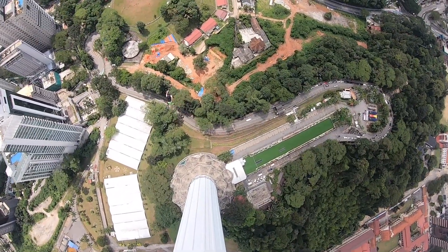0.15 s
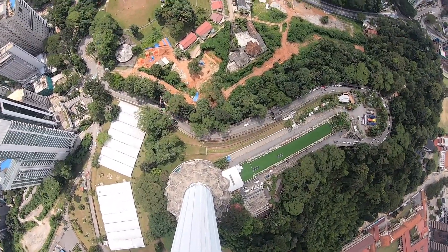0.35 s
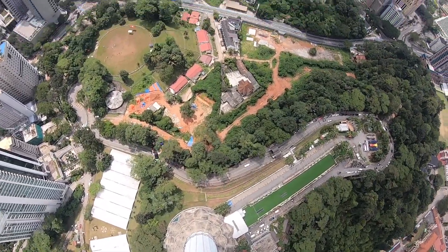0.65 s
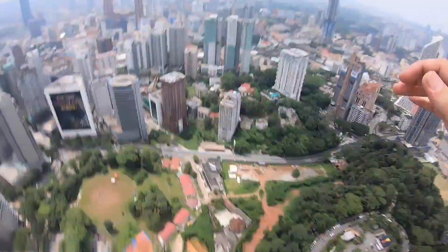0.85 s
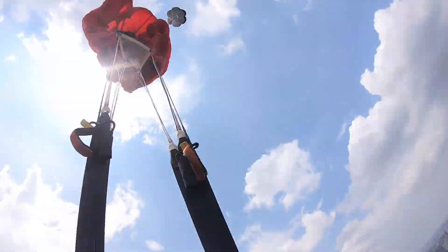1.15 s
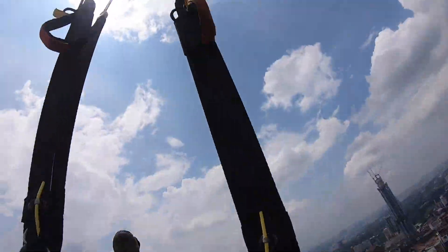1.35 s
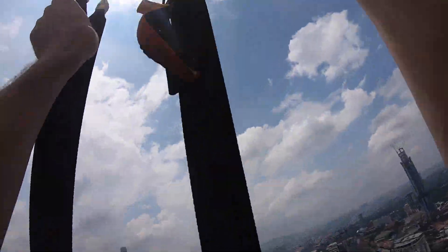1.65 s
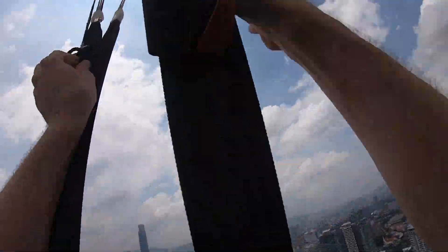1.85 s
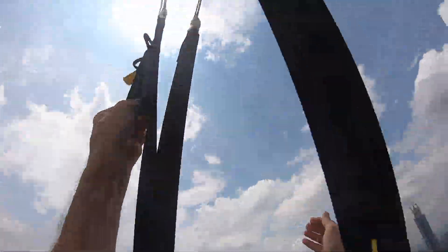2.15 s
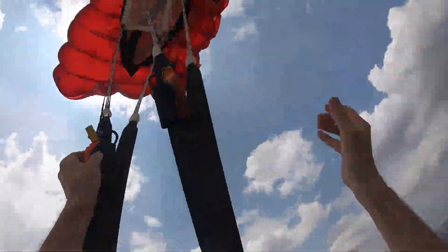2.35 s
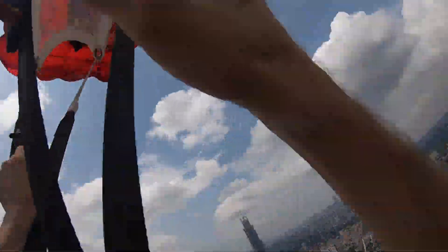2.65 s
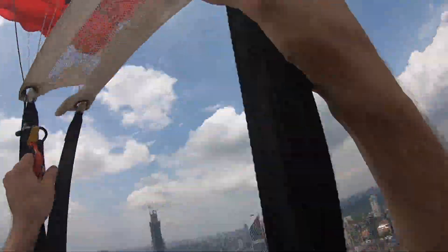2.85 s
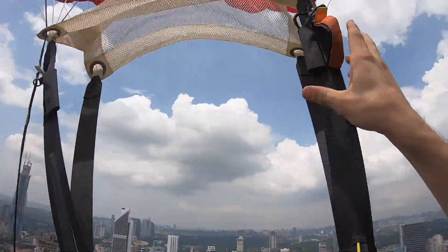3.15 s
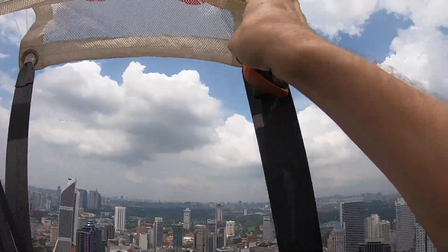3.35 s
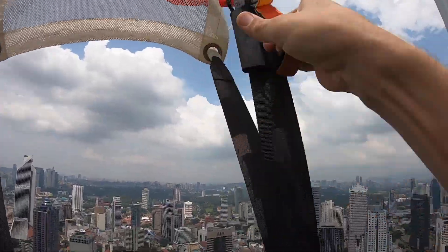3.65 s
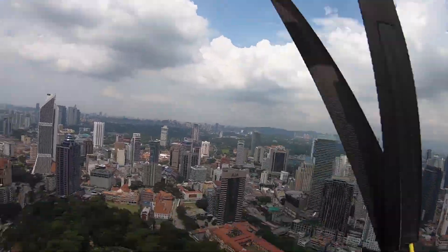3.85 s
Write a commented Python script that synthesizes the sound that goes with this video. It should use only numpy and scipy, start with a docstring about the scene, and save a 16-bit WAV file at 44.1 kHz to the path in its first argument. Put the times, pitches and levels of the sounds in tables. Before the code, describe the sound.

Loud wind rushes and rumbles on the microphone of a falling jumper. A parachute cracks and flaps open, then the wind dies to a soft hiss, with short rips of hook-and-loop tape near the end.

```python
"""Loud wind buffets the microphone as a jumper falls: low eddies under a churning rush of air.
A parachute streams out, cracks and flaps as it fills, and its hollows ring. The braked rush dulls
and dies down to a soft hiss of air past the lines and fluttering cloth. In the glide the webbing
rustles and the steering handles rip off their hook-and-loop tape in bursts of tiny clicks."""
import sys
import numpy as np
from scipy import signal
from scipy.fft import rfft, irfft, next_fast_len
from scipy.io import wavfile
from scipy.ndimage import uniform_filter1d

SR = 44100
rng = np.random.default_rng(int(sys.argv[2]) if len(sys.argv) > 2 else 0)


def dump_mix(stems):
    """Bounce the given channels to the path in sys.argv[1] as a 16-bit WAV at rate SR."""
    frames = np.atleast_2d(stems).T  # one column per channel
    limited = np.clip(frames, -1, 1)  # hard clip at full scale
    pcm = np.round(limited * 32767).astype(np.int16)
    wavfile.write(sys.argv[1], SR, pcm)


N = 176400
TIME = np.arange(N) / SR

# air past canopy and lines: t/s, canopy level/dB, line level/dB
HISS_LEVELS = [(1.1, -47, -53), (1.87, -49.5, -63), (2.1, -38.5, -52), (2.37, -41, -47.5),
               (2.75, -42.5, -64), (2.96, -48.5, -61.5), (3.15, -39.5, -57), (3.47, -54.5, -77),
               (3.68, -46, -61), (4, -44.5, -53)]
# tape rips, webbing scuffs: crest t/s, length/s, level/dB, tilt/(dB/oct)
TAPE_RIPS = [(.762, 0.0027, -21, 6), (1.098, 0.011, -39.5, 10), (2.838, 0.019, -45, -5),
             (3.037, 0.026, -42.5, 8), (3.051, 0.007, -30, -2.5), (3.71, 0.003, -31.5, -6),
             (3.744, 0.0051, -37, 1), (3.768, 0.0025, -24.5, -2.5), (3.782, 0.0033, -27, 0),
             (3.787, 0.035, -32, 1.5), (3.801, 0.0053, -20.5, -0.5), (3.838, 0.033, -41, -1),
             (3.87, 0.01, -23, -1.5), (3.877, .002, -24, 1), (3.884, 0.0073, -26.5, -3)]
# air and webbing past edges: crest t/s, length/s, level/dB, f/Hz, sweep/(oct/s), half-width/f
EDGE_SWISHES = [(0.249, 0.66, -19.5, 195.5, -0.82, .16), (1.21, 0.022, -27, 2350, -16, 0.14),
                (1.309, 0.12, -29.5, 1552, -4.5, 0.25), (3.167, 0.19, -51, 2020, -2, .14),
                (3.603, 0.046, -37, 483, 15.5, 0.48), (3.982, 0.085, -38, 2300, 0.5, 0.18)]
# flutter of the filling canopy: t/s, level/dB
FILLING_LEVELS = [(1.72, -42.5), (1.87, -46), (2.1, -46), (2.9, -55.5)]
# cloth flaps and gusts: crest t/s, length/s, level/dB, tilt/(dB/oct)
CLOTH_FLAPS = [(.865, 0.0094, -14.5, 2), (.943, 0.0056, -13.5, 4), (1.058, 0.0027, -17.5, 6.5),
               (1.067, 0.004, -24.5, 8), (1.175, 0.0054, -11, -2), (1.206, 0.008, -14.5, 6.5),
               (1.222, 0.017, -17, 1.5), (1.251, 0.0084, -22.5, 8), (1.301, 0.0067, -21, 6.5),
               (1.346, 0.0033, -7.5, -4), (1.413, 0.0093, -21.5, 3), (1.482, 0.007, -13, -2),
               (1.497, 0.0055, -16.5, 1.5), (1.548, 0.0023, -11, 1), (1.59, 0.003, -20.5, 2.5),
               (1.602, 0.0079, -14.5, -2.5), (1.646, 0.0035, -28.5, 1.5), (1.778, 0.0082, -27, -0.5),
               (1.833, 0.0041, -23, -3), (1.954, 0.01, -22.5, 0.5), (2.066, 0.0031, -18.5, -3),
               (2.278, 0.019, -23.5, -2.5), (2.326, 0.013, -19.5, -1), (2.675, 0.0073, -20, -10.5),
               (3.105, 0.046, -27.5, -9.5)]
# rush of the fall: t/s, level/dB, tilt/(dB/oct)
RUSH_LEVELS = [(0, -14, -0.5), (.85, -17, -0.5), (.98, -20.5, -4), (1.12, -19, -5.5), (1.27, -16.5, -3.5),
               (1.41, -16.5, -8), (1.49, -20, -6.5), (1.56, -23, -7), (1.87, -37, -8.5), (2.12, -38, -10),
               (2.3, -27.5, -5.5), (2.55, -36, -6), (3.2, -49.5, -1), (4, -46.5, 0.5)]
# eddies on the microphone: t/s, level/dB
BUFFET_LEVELS = [(0, -16.5), (.6, -15), (1.0, -17), (1.2, -14.5), (1.68, -15.5), (2.1, -18.5),
                 (2.25, -14.5), (2.6, -20.5), (2.95, -29.5), (3.23, -39), (3.45, -38.5), (3.63, -32.5),
                 (3.73, -38.5), (3.81, -30.5), (4, -28)]
# single heavy eddies: crest t/s, length/s, level/dB
HEAVY_EDDIES = [(3.105, 0.035, -16.5), (3.498, 0.01, -31)]

# source spectra: f/Hz, relative density/dB
CANOPY_SPECTRUM = [(150, 6.5), (400, 3.5), (1000, -2), (1800, -6), (3300, -12), (4300, -23.5),
                   (8000, -29.5), (11500, -62.5)]
LINE_SPECTRUM = [(1000, -14), (3200, 12.5), (5400, 5.5), (6200, -11.5), (8200, -15), (9500, -37)]
RIP_SPECTRUM = [(300, -21), (800, -16), (1300, 3), (2200, 1), (3000, 5.5), (4200, 0.5), (6000, -1.5),
                (8000, -12), (15000, -30.5)]
FLAP_SPECTRUM = [(80, -22), (170, 11), (350, 13.5), (700, 1), (1500, -8.5), (3000, -16.5), (6000, -32.5),
                 (15000, -72)]
RUSH_SPECTRUM = [(70, -15), (125, -2.5), (190, 1), (300, -3), (500, -7), (1400, -16), (2000, -20),
                 (4000, -26.5), (6500, -34.5), (9500, -37.5), (13000, -52.5)]
BUFFET_SPECTRUM = [(20, -1), (35, -4), (60, 0.5), (88, 0.5), (130, -3), (200, -13.5), (300, -19.5),
                   (1000, -83)]
# resonances of stiff tape and cloth hollows: f/Hz, width/Hz, gain/dB
TAPE_MODES = [(3110, 130, 4)]
HOLLOW_MODES = [(754, 150, 1), (1143, 200, 4), (1780, 200, -1)]

OPENING_S, FLUTTER_HZ, FLICKER_DB = 0.92, 36.7, 1.86
CREASES_PER_S, HOOKS_PER_S, LINE_TICKS_PER_S = 3500, 2000, 260


def from_db(db):
    return 10 ** (np.asarray(db) / 20)


def unit_rms(x):
    return x / np.sqrt(np.mean(x ** 2) + 1e-20)


def curves(rows):
    """Each column after t/s, interpolated per sample."""
    t_s, *columns = np.transpose(rows)
    return [np.interp(TIME, t_s, column) for column in columns]


def spectrum_db(spectrum, hz):
    """Spectrum interpolated over log frequency."""
    points_hz, points_db = np.transpose(spectrum)
    return np.interp(np.log(hz), np.log(points_hz), points_db)


def drift(rate_hz):
    """Low-passed random wander, rms 1."""
    hop, settle = 20, 2000
    pole = np.exp(-2 * np.pi * rate_hz * hop / SR)
    white = rng.standard_normal(N // hop + settle + 2)
    slow = signal.lfilter([1], [1, -2 * pole, pole * pole], white)[settle:]
    return np.interp(np.arange(N) / hop, np.arange(len(slow)), unit_rms(slow))


def coloured(x, spectrum, tilt_db_oct=0):
    """Unit-power minimum-phase filter: tilted spectrum, rolled off below 20 Hz."""
    size = 2 * next_fast_len(len(x) // 2 + 4096)
    hz = np.maximum(np.arange(size // 2 + 1) * SR / size, 1)
    gain_db = spectrum_db(spectrum, hz) + tilt_db_oct * np.log2(np.maximum(hz, spectrum[0][0]))
    gain = unit_rms(from_db(gain_db) * hz / np.hypot(hz, 20))
    cepstrum = irfft(np.log(gain))
    cepstrum[1:size // 2] *= 2
    cepstrum[size // 2 + 1:] = 0
    return irfft(rfft(x, size) * np.exp(rfft(cepstrum)))[:len(x)]


def banded_noise(density_db):
    """Half-octave noise bands following density_db(hz), each flickering; power about 1."""
    edges_hz = 57 * 2 ** np.arange(0, 8.1, .5)
    white = rng.standard_normal((2, N))
    out, power = 0, 0
    for k, (low_hz, high_hz) in enumerate(zip(edges_hz, edges_hz[1:])):
        bandpass = signal.butter(3, [low_hz, high_hz], "band", fs=SR, output="sos")
        band = unit_rms(signal.sosfilt(bandpass, white[k % 2]))
        gain = from_db(density_db(np.sqrt(low_hz * high_hz))) * np.sqrt(high_hz - low_hz)
        out += gain * band * from_db(FLICKER_DB * drift(rate_hz=19))
        power += gain ** 2
    return out / np.sqrt(power)


def clicks(per_s, size, spread_db=3.5):
    """Random impulses of uneven strength, rms 1."""
    chance, strength, sign = rng.random((3, size))
    level_db = spread_db * np.minimum(-np.log(1 - strength), 4)
    return unit_rms((chance < per_s / SR) * from_db(level_db) * np.sign(sign - .5))


def swell(t_s, length_s, rise=0.46, fall=0.61):
    """Skewed Gaussian envelope, crest at t_s = 0."""
    sigma_s = length_s * np.where(t_s < 0, rise, fall)
    return np.exp(-(t_s / sigma_s) ** 2 / 2)


def resonate(x, hz, width_hz):
    """Two-pole resonator, peak gain 1."""
    radius = np.exp(-np.pi * width_hz / SR)
    feedback = [1, -2 * radius * np.cos(2 * np.pi * hz / SR), radius ** 2]
    return signal.lfilter(np.array([1, 0, -1]) * (1 - radius ** 2) / 2, feedback, x)


def bursts(rows, spectrum, clicks_per_s, modes, tension_oct=0.21):
    """Swells of clicks ringing a material; tension shifts its modes at random per event."""
    out, half = np.zeros(N + SR), SR // 8
    t_s = np.arange(-half, half) / SR
    for crest_s, length_s, level_db, tilt_db_oct in rows:
        envelope = swell(t_s, length_s)
        detune = 2 ** (tension_oct * rng.standard_normal())
        crackle = coloured(clicks(clicks_per_s, len(t_s)) * envelope, spectrum, tilt_db_oct)
        ring = sum(from_db(db) * resonate(crackle, hz * detune, width_hz) for hz, width_hz, db in modes)
        gain = from_db(level_db) * np.sqrt(np.mean(envelope ** 2))
        start = int(crest_s * SR)
        out[start:start + len(t_s)] += gain * unit_rms(crackle + ring)
    return out[half:half + N]


def glide_hiss():
    """Fine crinkle of canopy cloth; brighter, ticking hiss of air past the lines."""
    canopy_db, lines_db = curves(HISS_LEVELS)
    creases = clicks(CREASES_PER_S, N)
    canopy = unit_rms(coloured(creases + rng.standard_normal(N), CANOPY_SPECTRUM))
    ticks = clicks(LINE_TICKS_PER_S, N, spread_db=5.5)
    lines = unit_rms(coloured(ticks / 2 + rng.standard_normal(N), LINE_SPECTRUM))
    hiss = from_db(canopy_db) * canopy + from_db(lines_db) * lines
    return hiss * from_db(FLICKER_DB * drift(FLUTTER_HZ))


def harness_rips():
    """Hooks tear loose and webbing scuffs; the stiff tape rings."""
    return bursts(TAPE_RIPS, RIP_SPECTRUM, HOOKS_PER_S, TAPE_MODES)


def edge_swishes(flicker_db=1.5, flicker_hz=55.7):
    """Eddies shed at edges: noise bands whose pitch sweeps with the speed."""
    out = 0
    for crest_s, length_s, level_db, hz, sweep_oct_s, half_width in EDGE_SWISHES:
        pitch_hz = hz * 2 ** np.clip(sweep_oct_s * (TIME - crest_s), -1, 1)
        phase = 2 * np.pi * np.cumsum(pitch_hz) / SR
        lowpass = signal.butter(2, half_width * hz, fs=SR, output="sos")
        in_phase, quadrature = signal.sosfilt(lowpass, rng.standard_normal((2, N)))
        band = unit_rms(in_phase * np.cos(phase) + quadrature * np.sin(phase))
        out += from_db(level_db) * swell(TIME - crest_s, length_s) * band
    return out * from_db(flicker_db * drift(flicker_hz))


def canopy_opening(tilt_db_oct=-9, flicker_db=8, flicker_hz=21.9):
    """Cloth cracks as it fills; air flutters in each hollow independently."""
    level_db, = curves(FILLING_LEVELS)
    flutter = 0
    for hz, width_hz, mode_db in HOLLOW_MODES:
        gain_db = mode_db + tilt_db_oct * np.log2(hz) + flicker_db * drift(flicker_hz)
        band = resonate(rng.standard_normal(N), hz, width_hz)
        flutter += from_db(gain_db) * resonate(band, hz, width_hz)
    cracks = bursts(CLOTH_FLAPS, FLAP_SPECTRUM, CREASES_PER_S, HOLLOW_MODES)
    return from_db(level_db) * unit_rms(flutter) + cracks


def fall_rush(churn_db=0.5, churn_hz=74.5, flutter_db=4, knee_hz=430):
    """Churning air; dulls as the fall is braked, shaken by the cloth once it is out."""
    level_db, tilt_db_oct = curves(RUSH_LEVELS)
    eddy_db = churn_db * drift(churn_hz)
    shake_db = flutter_db * drift(FLUTTER_HZ) * (TIME > OPENING_S)
    air = banded_noise(lambda hz: spectrum_db(RUSH_SPECTRUM, hz) + tilt_db_oct * np.log2(1 + hz / knee_hz))
    return from_db(level_db + eddy_db + shake_db) * air


def wind_buffet(gust_db=2, gust_hz=9.3):
    """Low eddy pressure on the microphone, a few heavy thumps; gusty under the swinging canopy."""
    level_db, = curves(BUFFET_LEVELS)
    eddies = coloured(rng.standard_normal(N + SR), BUFFET_SPECTRUM)[SR:]
    eddies /= np.sqrt(uniform_filter1d(eddies ** 2, size=4400))  # levelled over 0.1 s
    level_db += gust_db * drift(gust_hz) * (TIME > OPENING_S)
    thumps = sum(from_db(db) * swell(TIME - crest_s, length_s) for crest_s, length_s, db in HEAVY_EDDIES)
    return eddies * (from_db(level_db) + thumps)


def scene():
    """Wind, canopy and harness, mono."""
    air = wind_buffet() + fall_rush() + glide_hiss() + edge_swishes()
    return (air + canopy_opening() + harness_rips())[None]


def record(dry):
    """Microphone: soft clip, weak top octave, steep low-pass."""
    shelf_hz, shelf_db, cutoff_hz = 9130, -9, 16000
    rounded = 1.141 * np.tanh(dry / 1.056)
    low = signal.sosfilt(signal.butter(10, shelf_hz, "low", fs=SR, output="sos"), rounded)
    high = signal.sosfilt(signal.butter(10, shelf_hz, "high", fs=SR, output="sos"), rounded)
    shelved = low - from_db(shelf_db) * high  # the halves are in antiphase
    return signal.sosfilt(signal.cheby2(12, 70, cutoff_hz, fs=SR, output="sos"), shelved)


dry = scene()
out = record(dry)
dump_mix(out)
```